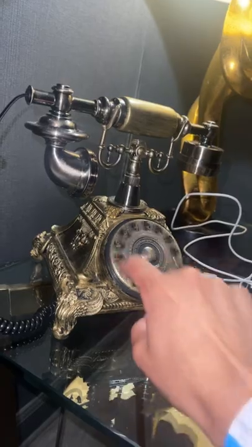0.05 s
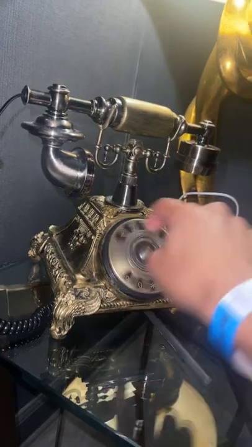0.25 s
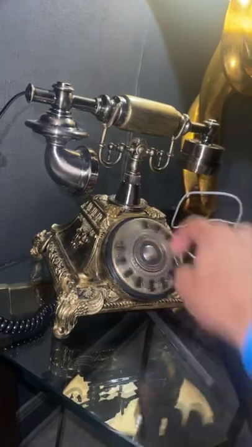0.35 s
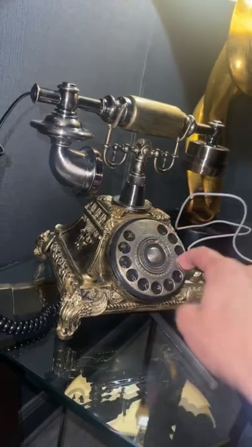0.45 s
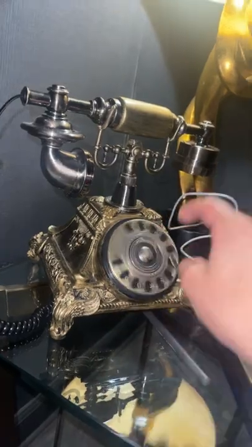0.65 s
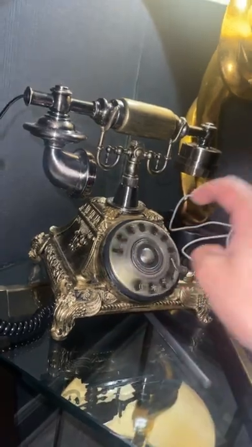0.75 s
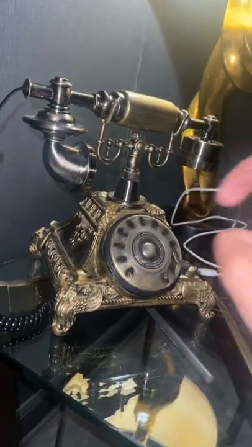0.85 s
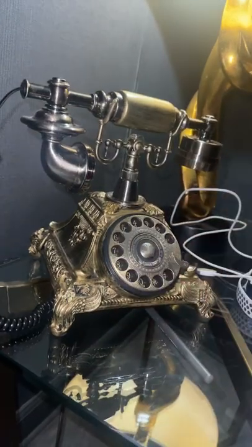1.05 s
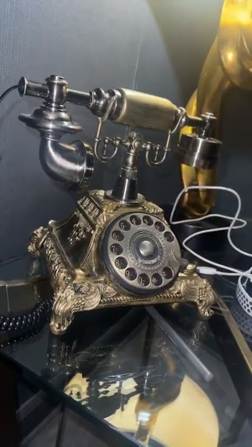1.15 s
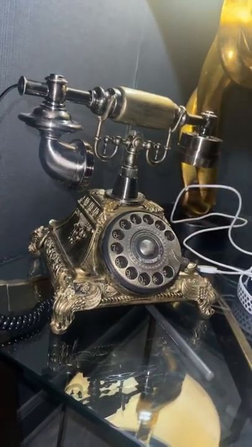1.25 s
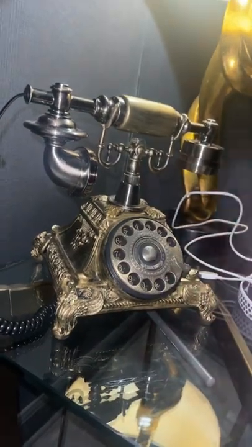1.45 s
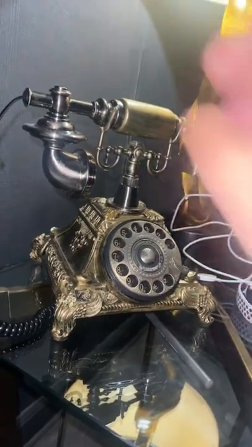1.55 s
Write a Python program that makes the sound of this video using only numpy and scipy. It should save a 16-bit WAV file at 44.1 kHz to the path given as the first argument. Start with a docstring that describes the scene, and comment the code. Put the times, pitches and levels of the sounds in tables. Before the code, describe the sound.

A rotary telephone dial is wound once with a ratcheting chatter, held briefly, then released. It spins back with a louder rattling whir and a few dull knocks, heard close up in a quiet, faintly humming room.

```python
"""A rotary telephone dial in a quiet, humming room; a faint ringing wash dies away at the start.
From 0.09 s a finger winds the dial over its ratchet: gear teeth chatter and ring the hollow case.
It is held at the stop and let go at 0.62 s; the spring spins it back, the stand shudders and the
governor knocks about 40 times a second. Near 1 s the heaviest knocks thud through the base.
A small metal part rings on faintly as the dial comes to rest at 1.33 s."""
import sys
import numpy as np
from scipy import signal
from scipy.fft import rfft, irfft, next_fast_len
from scipy.io import wavfile
from scipy.ndimage import uniform_filter1d, map_coordinates

SR = 44100
rng = np.random.default_rng(int(sys.argv[2]) if len(sys.argv) > 2 else 0)


def dump_mix(stems):
    """Bounce the given channels to the path in sys.argv[1] as a 16-bit WAV at rate SR."""
    frames = np.atleast_2d(stems).T  # one column per channel
    limited = np.clip(frames, -1, 1)  # hard clip at full scale
    pcm = np.round(limited * 32767).astype(np.int16)
    wavfile.write(sys.argv[1], SR, pcm)


N = 70560
TIME_S = np.arange(N) / SR


def amp(db):
    """dB to gain."""
    return 10 ** (np.asarray(db) / 20)


def unit(x):
    """Scale to rms 1."""
    return x / np.sqrt(np.mean(x ** 2) + 1e-20)


def along(points, hz):
    """Interpolate (frequency [Hz], value) points on a log axis."""
    knots_hz, values = np.transpose(points)
    return np.interp(np.log(hz + 1), np.log(knots_hz + 1), values)


def levels(rows):
    """Per-sample dB curve for each level column; silent outside the rows."""
    times_s, *columns = np.transpose(rows)
    return [np.interp(TIME_S, times_s, db, left=-120, right=-120) for db in columns]


def wobble(knots_per_s):
    """Smooth random curve."""
    knots = rng.standard_normal(int(N * knots_per_s / SR) + 4)
    return map_coordinates(knots, [TIME_S * knots_per_s])


def filtered(x, response):
    """Zero-phase filter with gain response(hz)."""
    size = next_fast_len(N + SR // 2)
    return irfft(rfft(x, size) * response(np.fft.rfftfreq(size, 1 / SR)), size)[:N]


def noise(colour):
    """Coloured noise, rms 1."""
    return unit(filtered(rng.standard_normal(N), lambda hz: amp(along(colour, hz))))


def minimum_phase(gain):
    """Causal impulse response with this gain, by cepstral folding."""
    cepstrum = irfft(np.log(np.maximum(gain, 1e-6)))
    half = len(cepstrum) // 2
    cepstrum[1:half] *= 2
    cepstrum[half + 1:] = 0
    return irfft(np.exp(rfft(cepstrum)))[:half]


def struck(modes, start_s, rise_s=0.003):
    """Decaying sine modes with a soft attack."""
    t = np.maximum(TIME_S - start_s, 0)
    ring = sum(amp(db - 60 * t / t60_s) * np.sin(2 * np.pi * hz * t) for hz, db, t60_s in modes)
    return (1 - np.exp(-t / rise_s)) * ring


def air_hum():
    """Steady low noise of the room air."""
    # air spectrum (frequency [Hz], relative level [dB])
    colour = [(20, -42), (32, -25), (42, -5), (62, 5), (90, -0.5), (150, 1.5), (200, -5.5), (250, 0.5),
              (400, -10), (800, -10.5), (1450, -19), (2000, -29.5), (2900, -29), (3500, -41.5), (6000, -49),
              (10000, -49.5), (11500, -64), (16000, -66)]
    return amp(-51) * noise(colour)


def ringing_wash(level_db=-59.5, t60_s=0.37):
    """Faint noise, peaked near 3 and 4.6 kHz, dying away from the start."""
    # wash spectrum (frequency [Hz], relative level [dB])
    colour = [(1500, -38), (2500, -15), (2900, -10.5), (2985, 0), (3100, -10), (3600, -13), (4100, -26),
              (4450, -16), (4560, -3), (4700, -16), (5400, -20), (6500, -33), (10000, -38), (15000, -55)]
    return amp(level_db - 60 * TIME_S / t60_s) * noise(colour)


def tooth_contacts(samples, rate_per_s=4000, log_spread=0.4, smear_s=0.0011):
    """Random contacts of uneven size, each scattered briefly through the mechanism; rms 1."""
    hit = rng.random(samples) < rate_per_s / SR
    polarity, size = rng.standard_normal((2, samples))
    impulses = hit * np.sign(polarity) * np.exp(log_spread * size)
    t = np.arange(1024) / SR
    spectrum = rfft(rng.standard_normal(len(t)) * np.exp(-t / smear_s), 2 * len(t))
    smear = irfft(spectrum / np.abs(spectrum))[:len(t)]  # flat magnitude
    return unit(signal.fftconvolve(impulses, smear)[:samples])


def contact_responses(colour, crossovers_hz=(2680, 5370)):
    """Response to one contact in three bands: case ring, gear clatter, tooth sizzle."""
    # case and dial plate resonances (frequency [Hz], width [Hz], lift [dB])
    modes = [(1411, 28, 6.5), (1470, 40, 9.5), (1579, 30, 6), (1670, 28, 4.5), (1752, 28, 3), (1846, 32, 6),
             (2063, 35, 8.5), (2260, 67, 8), (2676, 25, -1), (2950, 45, 8.5), (3333, 50, 6.5),
             (4189, 30, 6), (4610, 80, 9)]
    hz = np.fft.rfftfreq(8192, 1 / SR)
    lift_db = sum(db / (1 + (2 * (hz - mode_hz) / width_hz) ** 2) for mode_hz, width_hz, db in modes)
    body = amp(along(colour, hz) + lift_db)
    low, mid = [1 / (1 + (hz / edge_hz) ** 10) for edge_hz in crossovers_hz]
    return [minimum_phase(body * np.sqrt(share)) for share in (low, (1 - low) * mid, 1 - mid)]


def patchy(x, depth_db):
    """Random time-frequency gain: every few contacts favour other frequencies."""
    spectra = signal.stft(x, nperseg=256)[2]
    field = uniform_filter1d(rng.standard_normal(spectra.shape), size=4, axis=0)
    field = unit(uniform_filter1d(field, size=3, axis=1))
    return unit(signal.istft(spectra * amp(depth_db * field), nperseg=256)[1][:N])


def gear_chatter(envelope, responses, band_trims_db, rub, patchy_db, rough_db=0):
    """Running gears: an uneven stream of contacts over a little rubbing."""
    force = patchy(tooth_contacts(N) + rub * rng.standard_normal(N), patchy_db)
    force *= amp(rough_db * wobble(knots_per_s=170))
    out = np.zeros(N)
    for db, trim_db, response in zip(levels(envelope), band_trims_db, responses):
        steady_rms = signal.fftconvolve(force, response)[:N].std()
        out += signal.fftconvolve(force * amp(db + trim_db), response)[:N] / steady_rms
    return out


def blows(rows, responses, band_trims_db, rise_s, snap=0):
    """Short rattles with an optional snap; the case rings up a moment later."""
    out, t = np.zeros(N + SR), np.arange(SR // 20) / SR
    swell = 1 - np.exp(-t / rise_s)
    crack = snap * (t == 0)
    for start_s, *bands_db, decay_s in rows:
        rattle = tooth_contacts(len(t)) * np.exp(-t / decay_s)
        forces = rattle * swell, rattle * np.sqrt(swell) + crack, rattle + crack
        for db, trim_db, force, response in zip(bands_db, band_trims_db, forces, responses):
            band = unit(signal.fftconvolve(force, response)[:len(t)])
            out[round(start_s * SR):][:len(t)] += amp(db + trim_db) * band
    return out[:N]


def winding():
    """The finger drags the dial round over its ratchet."""
    # contact spectrum (frequency [Hz], relative level [dB])
    colour = [(150, -50), (450, -23), (900, -15.5), (1270, -8.5), (1400, 2.5), (1620, 0), (1850, -4.5),
              (2200, -13), (3300, -11.5), (5000, -17), (6200, -19.5), (8000, -18.5), (9600, -14),
              (11800, -34.5), (15500, -35)]
    # gear chatter before trim (time [s], ring [dB], clatter [dB], sizzle [dB])
    envelope = [(0.085, -49, -53, -61), (0.171, -40, -52.5, -58.5), (0.197, -34, -35, -59),
                (0.215, -40, -44, -56), (0.235, -39.5, -40.5, -56.5), (0.259, -29, -36.5, -45),
                (0.345, -31.5, -28.5, -45.5), (0.361, -32, -32, -37.5), (0.449, -31, -33.5, -37.5),
                (0.467, -26.5, -30, -35), (0.491, -32.5, -37.5, -50.5), (0.499, -25, -30, -44.5),
                (0.513, -40, -55, -57.5), (0.62, -61.5, -63.5, -76)]
    # ratchet catches before trim (time [s], ring [dB], clatter [dB], sizzle [dB], decay [s])
    catches = [(0.0872, -46, -45, -59, 0.001), (0.138, -54, -42, -70, 0.001),
               (0.2102, -26.5, -37.5, -49, 0.0018), (0.2158, -23.5, -29.5, -53.5, 0.0036),
               (0.2625, -27.5, -34.5, -34, 0.0037), (0.2902, -33, -26.5, -45.5, 0.003),
               (0.2982, -35.5, -28.5, -37, 0.0046), (0.3054, -34.5, -29.7, -40, 0.0052),
               (0.3285, -25.5, -31.5, -38, 0.0035), (0.3555, -21.5, -23, -31, 0.0054),
               (0.3652, -44, -27.5, -48.5, 0.009), (0.3735, -25, -32.5, -44, 0.0052),
               (0.3834, -28, -29, -37, 0.003), (0.3954, -23, -23.5, -32.5, 0.0021),
               (0.4035, -28.5, -37.5, -44, 0.0011), (0.429, -21, -26, -38, 0.01),
               (0.4632, -23, -26, -34.5, 0.003), (0.4738, -28.5, -26.5, -33.5, 0.002),
               (0.4975, -26, -28, -41, 0.0017), (0.5417, -33.1, -42.5, -59, 0.005)]
    responses = contact_responses(colour)
    gears = gear_chatter(envelope, responses, band_trims_db=(-0.5, -3.5, -2), rub=0.57, patchy_db=3.5)
    return gears + blows(catches, responses, band_trims_db=(-10.5, -11, -10.5), rise_s=0.004)


def room_reverb(x, level_db=-18):
    """Diffuse tail; the treble dies first."""
    # room decay (frequency [Hz], t60 [s])
    decay = [(300, .4), (2000, 0.5), (6000, 0.39), (10000, 0.22), (12000, .14), (15000, 0.063)]
    hz, t, spectra = signal.stft(rng.standard_normal(SR // 2), SR, nperseg=256)
    tail = signal.istft(spectra * amp(-60 * t / along(decay, hz)[:, None]), SR, nperseg=256)[1]
    return amp(level_db) * signal.fftconvolve(x, tail / np.linalg.norm(tail))[:N]


def stand_shudder():
    """The spinning dial shakes the stand: rumble near 90 Hz."""
    # rumble envelope (time [s], level [dB])
    envelope = [(0.6, -68), (0.61, -55), (0.744, -49), (1.116, -49.5), (1.134, -41), (1.322, -72),
                (1.35, -75.5)]
    # rumble spectrum (frequency [Hz], relative level [dB])
    colour = [(40, -26), (70, -3), (90, 5), (115, -2.5), (170, -10.5), (400, -51.5)]
    return amp(levels(envelope)[0]) * noise(colour)


def spin_back():
    """The spring drives the gears back; release, governor and final stop knock."""
    # contact spectrum (frequency [Hz], relative level [dB])
    colour = [(150, -35.5), (380, -24.5), (520, -12.5), (900, -9), (1290, -5.5), (1420, -0.5), (1850, -1),
              (2200, -7), (4000, -2.5), (6200, -15.5), (8000, -18), (9300, -14.5), (11800, -30.5),
              (15500, -32)]
    # gear chatter before trim (time [s], ring [dB], clatter [dB], sizzle [dB])
    envelope = [(0.62, -55, -77, -61), (0.63, -39, -49, -75), (0.644, -27, -30, -40),
                (0.656, -28, -36, -43.5), (0.708, -23.5, -26.5, -25.5), (0.782, -24, -24.5, -28),
                (0.786, -23.5, -28.5, -28.5), (0.898, -21.5, -29, -28.5), (0.926, -25.5, -30.5, -31),
                (1.0, -19.5, -29, -26), (1.04, -23, -31.5, -30.5), (1.106, -22.5, -23, -28.5),
                (1.118, -25.5, -36.5, -37), (1.214, -38, -55, -63), (1.245, -66, -62, -62)]
    # knocks before trim (time [s], ring [dB], clatter [dB], sizzle [dB], decay [s])
    knocks = [(0.6422, -26.5, -23.5, -28.5, 0.004), (0.663, -30.5, -32, -33, 0.003),
              (0.68, -22.5, -22.5, -29, 0.004), (0.7299, -19.5, -20.5, -23, 0.002),
              (0.7535, -18, -24, -26.5, 0.004), (0.7778, -19, -20.5, -31, 0.003),
              (0.8288, -24, -20.5, -26.5, 0.003), (0.8528, -15.5, -33, -30.5, 0.003),
              (0.8748, -19, -27.5, -26, 0.004), (0.9004, -20.5, -27.5, -25.5, 0.003),
              (0.9557, -24.5, -37, -30.5, 0.002), (0.9799, -16.5, -20, -26, 0.003),
              (1.003, -23.5, -23, -21, 0.003), (1.0505, -24, -26, -37, 0.003),
              (1.0754, -18.5, -21.0, -28.7, 0.005), (1.0992, -21, -17, -26.7, 0.006),
              (1.136, -24.5, -29, -40, 0.006), (1.3325, -44, -55, -79, 0.005)]
    responses = contact_responses(colour)
    gears = gear_chatter(envelope, responses, band_trims_db=(-1, -3.5, -1.5),
                         rub=0.33, patchy_db=2.5, rough_db=-0.2)
    return gears + blows(knocks, responses, band_trims_db=(-11, -11, -9), rise_s=0.0015, snap=4.9)


def base_thuds():
    """The heaviest knocks thud through the base."""
    # thuds (time [s], level [dB])
    thuds = [(.982, -30), (1.003, -34), (1.099, -29)]
    # base modes (frequency [Hz], relative level [dB], t60 [s])
    modes = [(510, -3, .06), (603, 0, .08)]
    return sum(amp(db) * struck(modes, start_s) for start_s, db in thuds)


def metal_ring():
    """A small metal part, struck once, rings on."""
    # modes of the part (frequency [Hz], level [dB], t60 [s])
    modes = [(3009, -52, 1.0), (4860, -41.5, 0.63), (9953, -57, .55), (14295, -72.5, .35)]
    return struck(modes, start_s=1.075)


def scene():
    """Dial, stand and room; mono."""
    dial = winding() + spin_back()
    direct = ringing_wash() + dial + stand_shudder() + base_thuds() + metal_ring()
    return (direct + room_reverb(dial) + air_hum())[None]


def record(dry):
    """Steep low-pass."""
    cutoff_hz = 15830
    return filtered(dry[0], lambda hz: 1 / (1 + (hz / cutoff_hz) ** 400))[None]


dry = scene()
out = record(dry)
dump_mix(out)
```